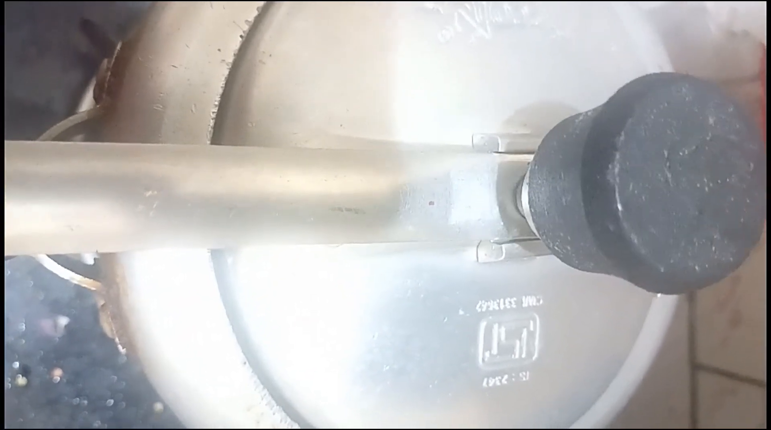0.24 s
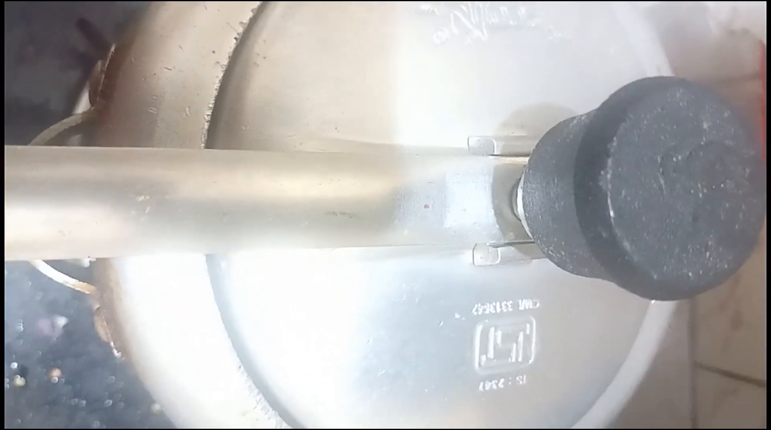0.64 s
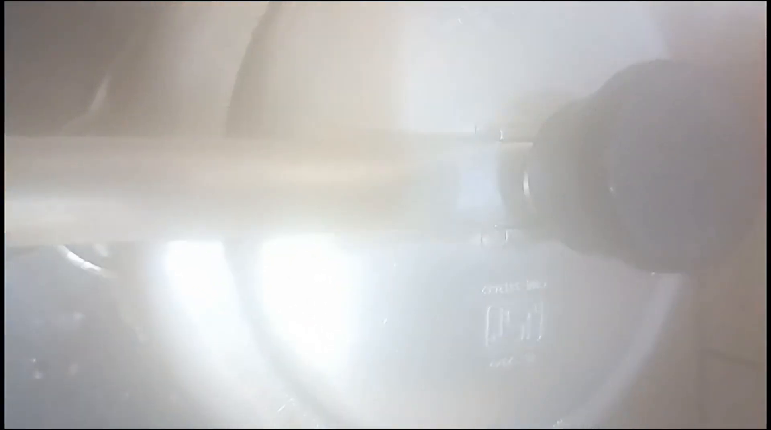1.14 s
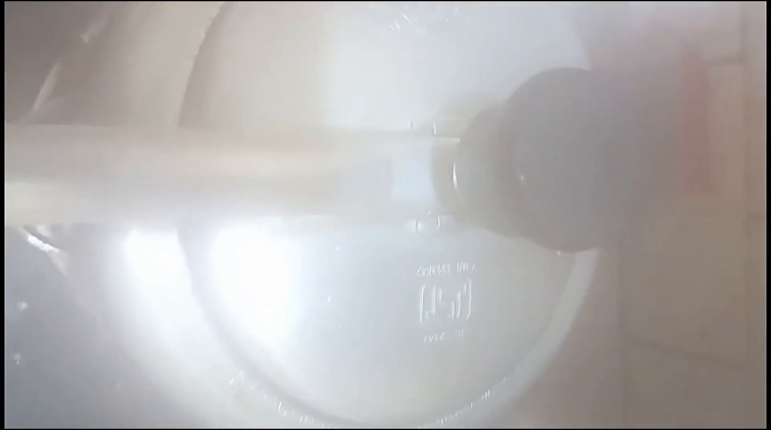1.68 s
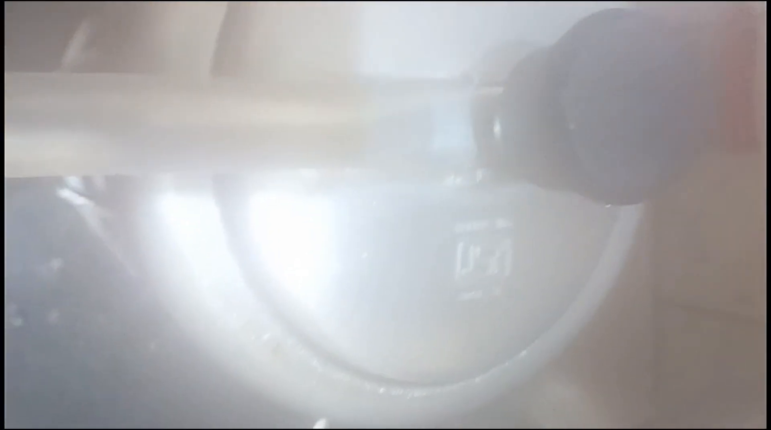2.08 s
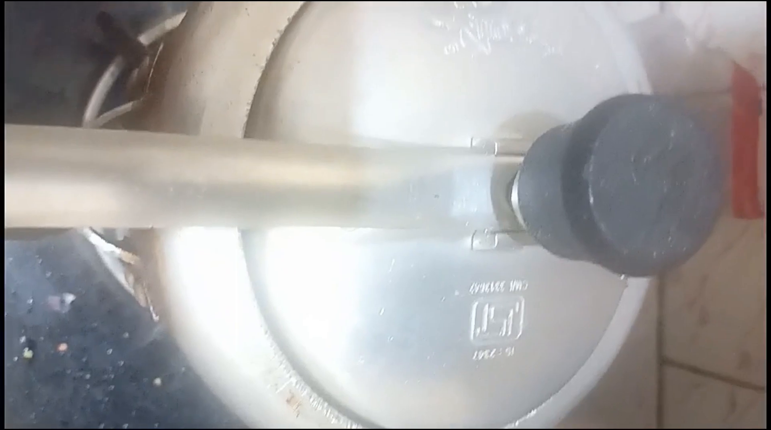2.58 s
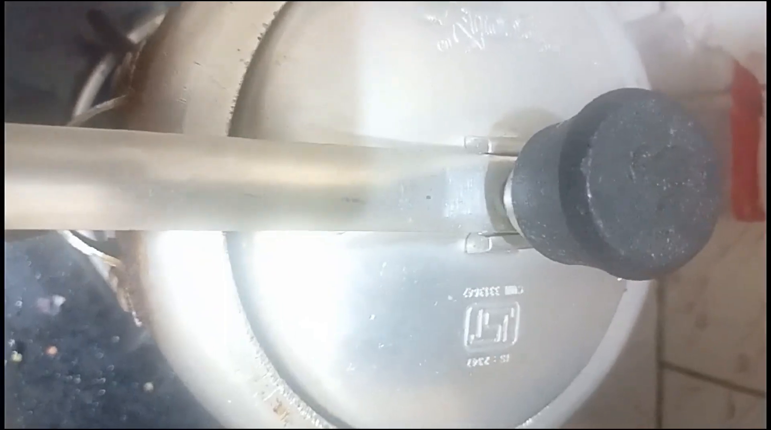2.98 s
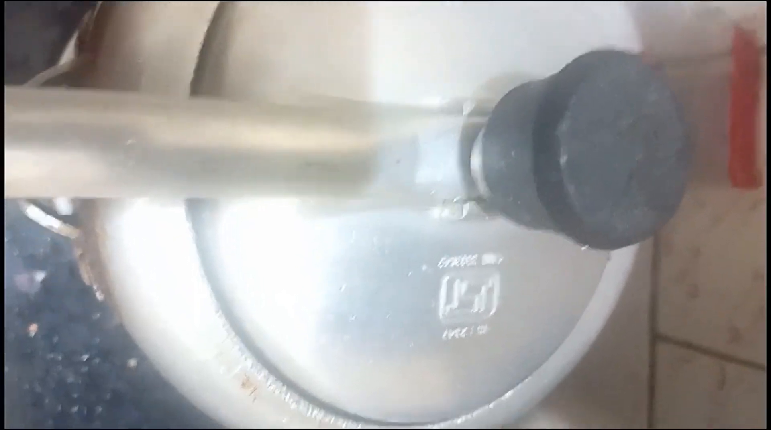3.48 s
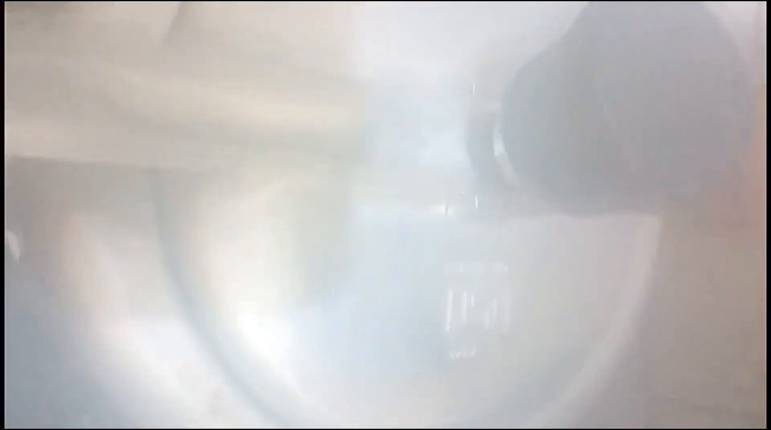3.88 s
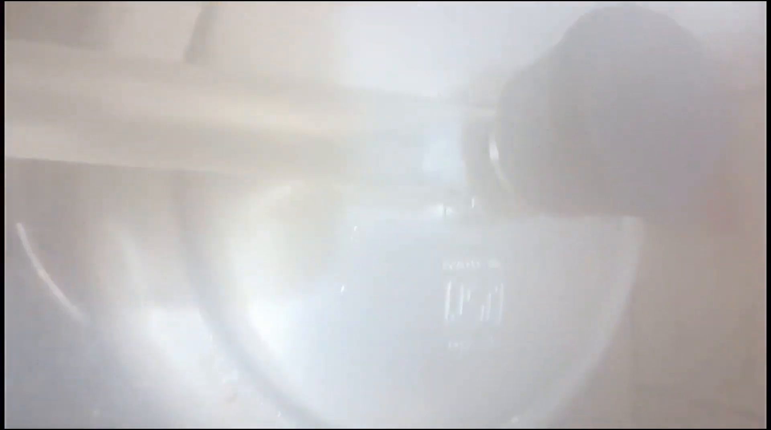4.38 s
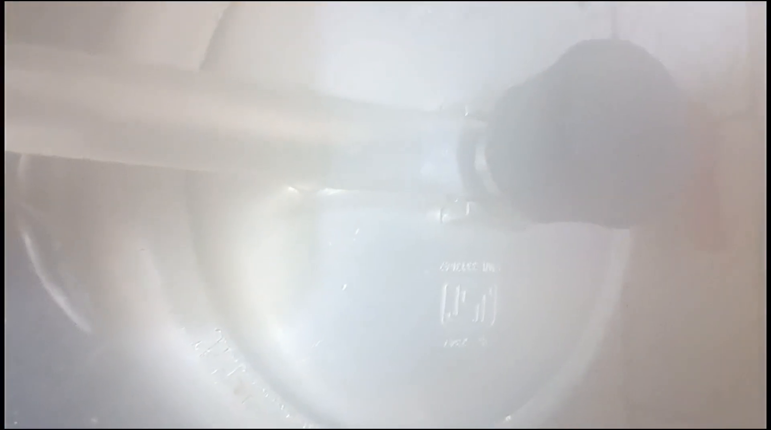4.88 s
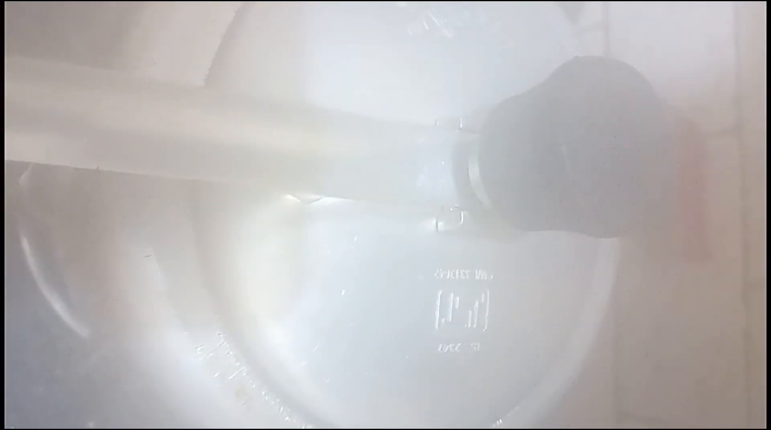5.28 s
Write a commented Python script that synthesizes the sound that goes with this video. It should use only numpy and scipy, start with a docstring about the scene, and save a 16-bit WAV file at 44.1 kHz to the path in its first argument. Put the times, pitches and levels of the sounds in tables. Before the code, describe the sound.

Close, sharp hiss of steam from a pressure cooker stops as its weight settles, then returns in a shorter second burst.

```python
"""A pressure cooker vents steam a hand's width from a phone, in a tiled kitchen with a very faint background.
It leaks and spits, then the weight lifts and the jet hisses through its cavities, ringing off the tiles
and blowing puffs onto the microphone. At 3.3 s the weight knocks back onto its seat and the hiss fades;
then the level drops abruptly. After a brief mute a second burst fades in, ending the same way at 4.9 s.
Last, a faint hum and a far tone come in."""
import sys
import numpy as np
from scipy import signal
from scipy.io import wavfile
from scipy.ndimage import uniform_filter1d

SR = 44100
rng = np.random.default_rng(int(sys.argv[2]) if len(sys.argv) > 2 else 0)


def put_to_file(sound):
    """Save the sound as 16-bit audio at rate SR, in the file named by the first command-line argument."""
    columns = np.atleast_2d(sound).T  # one column per channel
    safe = np.clip(columns, -1, 1)
    whole_steps = np.round(safe * 32767)
    wavfile.write(sys.argv[1], SR, whole_steps.astype(np.int16))


N = 244314
T = np.arange(N) / SR


def undb(db):
    """Gain of a dB value."""
    return 10 ** (np.asarray(db) / 20)


def level(x, db):
    """Set a sound to an rms level."""
    return x * undb(db) / np.sqrt(np.mean(x ** 2))


def ramp(start, length):
    """Rise from 0 to 1; start and length in seconds."""
    return np.clip((T - start) / length, 0, 1)


def colour_db(points, hz):
    """An EQ curve: points joined on a log-frequency axis."""
    f, db = np.transpose(points)
    return np.interp(np.log(hz + 1), np.log(f), db)


def shaped_noise(db_of, size):
    """White noise through a moving EQ, db_of(Hz, seconds)."""
    hz, s, frames = signal.stft(rng.standard_normal(N), SR, nperseg=size)
    return signal.istft(frames * undb(db_of(hz[:, None], s)), SR, nperseg=size)[1][:N]


def patches(shape, bins, steps):
    """Random drift with a spread of 1, smooth over neighbouring bins and time steps."""
    field = uniform_filter1d(uniform_filter1d(rng.standard_normal(shape), bins, axis=0), steps, axis=1)
    return field / field.std()


def clicks(times, sizes):
    """Single-sample impulses."""
    out = np.zeros(N)
    np.add.at(out, (np.asarray(times) * SR).astype(int), sizes)
    return out


# The colour of the room tone. Each row: frequency in Hz, relative level in dB.
ROOM_COLOUR = [(24, -39.5), (45, -15.5), (93, -4.5), (160, -10), (340, -11.5), (520, -16), (1000, -26),
               (2560, -26), (3460, -18.5), (10100, -25.5), (15400, -19)]
def room_tone():
    """A very faint, wavering bed of low-heavy noise."""
    def db_of(hz, at):
        return colour_db(ROOM_COLOUR, hz) + 2.5 * patches((len(hz), len(at)), bins=6, steps=3)
    return level(shaped_noise(db_of, size=2048), db=-81.5)


# The ride of the jet, one list per burst. Each row: time in seconds, hiss level in dB,
# treble lift in dB, relative level of the draught on the microphone in dB.
BURSTS = [
    [(0.0, -37, 4, -49.5), (0.102, -36.5, 1.5, -51), (0.158, -26.5, -1, -49), (0.204, -23.5, 4.5, -56),
     (0.226, -14, -0.5, -51), (0.3, -16.5, 0, -55), (0.41, -19, 0.2, -42), (0.55, -23.5, -1, -56),
     (0.69, -26, -1, -56), (0.88, -27.5, -1.5, -59.5), (1.23, -30, 1, -60.5), (1.94, -33, -1, -62),
     (2.2, -34, 2.2, -57), (2.28, -26.5, 0.7, -57), (2.37, -27.5, 0, -61.5), (3.14, -25.5, 0, -61.5),
     (3.3, -26.5, 3, -64)],
    [(3.65, -30.5, 3, -70), (3.85, -29, 1.2, -63), (3.948, -29.5, 2.5, -56), (4.056, -31, 2, -62),
     (4.246, -31, -0.3, -64), (4.614, -33, 2.5, -64), (4.752, -33.5, 0.4, -63), (4.84, -30.5, 1, -74),
     (4.9, -27.5, 1.5, -55)],
]
# The hiss fades as the weight sinks; then the level drops abruptly. Each row: fade start in seconds,
# time of the level drop in seconds, drop in dB, slope of the fade in dB per second.
ENDINGS = [(3.301, 3.418, -8, -210), (4.899, 4.998, -9, -185)]
REOPEN_S = BURSTS[1][0][0]
def vent(tail_db_per_s=-230, shut_treble_db=-6, shut_roar_db=13, leak_roar_db=5.5, still_air_db=-88):
    """Level, treble, low roar and draught curves in dB: two bursts, each fading as the weight sinks."""
    times, *columns = np.vstack(BURSTS).T
    second = T >= REOPEN_S
    held = np.where(second, T, np.minimum(T, BURSTS[0][-1][0]))
    level_db, treble_db, draught_db = (np.interp(held, times, column) for column in columns)
    start, drop, _, slope = np.transpose(ENDINGS)[:, second.astype(int)]
    fade_db = slope * np.clip(np.minimum(T, drop) - start, 0, None)
    fade_db += tail_db_per_s * np.clip(T - drop, 0, None)
    fade_db += second * 0.78 * 20 * np.log10(ramp(REOPEN_S, 0.31) + 0.017)  # the second burst fades in
    leaking = 1 - ramp(0.14, .04)  # more low roar before the weight lifts
    closing = ramp(start, 0.062)  # the closing gap dulls the hiss
    return (level_db + fade_db,
            treble_db + shut_treble_db * closing,
            leak_roar_db * leaking + shut_roar_db * closing,
            np.maximum(draught_db + fade_db, still_air_db))


# The colour of the hiss: one list for the first blast, then one for each of three places of the phone.
# Each row: frequency in Hz, relative level in dB.
HISS_COLOURS = [
    [(180, -49), (300, -20), (492, -20.5), (1030, -27), (1810, -20), (1960, -22.5), (2470, -16.5),
     (3330, -5), (4400, -3), (5280, -6), (5730, -5.5), (7840, -4.5), (9870, -7.5), (11800, -4.5),
     (15400, -0.5)],
    [(180, -33), (300, -22.5), (1050, -26), (1810, -19), (1960, -22.5), (2470, -17), (3270, -6.5),
     (3860, -5.5), (4400, -4.5), (5360, -5.5), (5730, -4.5), (7710, -3), (9710, -9.5), (13300, -2.5),
     (15400, 0.5)],
    [(180, -30.5), (300, -23), (1200, -26.5), (1810, -18), (2030, -24), (2470, -15), (3330, -2.5),
     (3610, -6), (4470, -3), (5190, -9.5), (7840, -3), (9870, -9.5), (11300, -7.5), (13100, -2), (15400, 1)],
    [(180, -32), (300, -24), (1120, -27), (1640, -22), (1900, -26), (2560, -18.5), (3270, -10),
     (3920, -4.5), (5640, -8), (7970, -6.5), (9710, -14), (11400, -10), (12600, -6.5), (13700, -1.5),
     (15400, -5.5)],
]
COLOUR_SWITCHES_S = (.6, 1.9, 3.62)
# The cavities of vent and weight. Each row: centre in Hz, width in Hz, boost or cut in dB.
CAVITIES = [(1884, 65, 1), (3308, 79, 5.5), (3870, 59, 5.5), (4410, 330, 2.5), (5310, 180, -2),
            (5780, 130, 2.5), (6830, 140, 3.5), (7060, 110, 2.5), (7740, 220, 5), (8270, 87, 2.5),
            (10100, 600, -4), (11730, 200, 4.5), (13100, 200, 1.5), (13800, 410, 2)]
def jet(level_db, treble_db, roar_db):
    """Turbulent hiss: bands swell in slow patches and flicker, small eddies roughen the level."""
    def db_of(hz, at):
        place = np.searchsorted(COLOUR_SWITCHES_S, at)
        db = np.hstack([colour_db(colour, hz) for colour in HISS_COLOURS])[:, place]
        db += sum(lift_db / (1 + (2 * (hz - centre) / width) ** 2) for centre, width, lift_db in CAVITIES)
        db += np.clip((hz - 8500) / 3000, 0, 1) * np.interp(at, T, treble_db)
        db += np.clip((2800 - hz) / 1100, 0, 1) * np.interp(at, T, roar_db)
        db += 0.87 * patches(db.shape, bins=8, steps=30)
        db += .9 * patches(db.shape, bins=24, steps=3)
        body = (hz[:, 0] > 2500) & (hz[:, 0] < 9000)  # level_db sets this band
        return db - 10 * np.log10(np.sum(undb(2 * db[body]), axis=0) / len(hz))
    eddies_db = 0.44 * patches((1, N), 1, 300)[0] + 0.18 * patches((1, N), 1, 2500)[0]
    return shaped_noise(db_of, size=1024) * undb(level_db + eddies_db)


def tiles(x, t60, wet_db):
    """Direct sound plus a dense, decaying scatter of echoes off the tiles."""
    t = T[:SR // 2]
    echoes = rng.standard_normal(len(t)) * np.exp(-np.log(1000) * t / t60) * (t > .002)
    return x + undb(wet_db) * signal.fftconvolve(x, echoes / np.sqrt(np.sum(echoes ** 2)))[:N]


# Drops of water in the vent. Each row: start in seconds, relative level in dB.
SPITS = [(.04, -41), (.121, -23), (.15, -18)]
def spits(attack_s=.0022):
    """Drops spat out as the weight lifts, each a short burst of narrow hiss."""
    starts, db = np.transpose(SPITS)
    age = T[:1024] / attack_s
    envelope = signal.fftconvolve(clicks(starts, undb(db)), age * np.exp(1 - age))[:N]
    band = signal.butter(2, (2700, 4800), "bandpass", fs=SR, output="sos")
    return envelope * level(signal.sosfilt(band, rng.standard_normal(N)), db=-8.0)


# Surges and dips of the jet. Each row: centre in seconds, boost or cut in dB, half-width in seconds.
SURGES = [(0.044, 3.5, 0.0056), (0.163, 4, 0.0037), (0.173, 6.5, 0.0044), (0.195, 3, 0.0036),
          (0.226, 1.5, 0.0058), (3.34, -3, 0.003), (3.355, 6, .004)]
def flutter_db():
    """The weight flutters as it lifts or lands, and the whole jet surges with it."""
    return sum(db * np.exp(-((T - at) / width) ** 2) for at, db, width in SURGES)


def push(swell_ms):
    """Air pushes the diaphragm and leaks away; the phone's bass cut swings it back twice."""
    t = T[:2048]
    pressure = np.exp(-t / 0.0012) * (1 - np.exp(-(t / (swell_ms / 1000)) ** 2))
    thump = signal.sosfilt(signal.butter(3, 78, "highpass", fs=SR, output="sos"), pressure)
    return thump / thump.max()


# The clear puffs. Each row: time in seconds, peak in dB, direction as +1 or -1, swell in milliseconds.
PUFFS = [(0.223, -39, 1, 2), (0.2307, -12, -1, 0.68), (.2627, -34, -1, 1.8), (0.324, -34, 1, 2),
         (0.342, -27.5, -1, 2.2), (0.3515, -32, 1, 1.7), (0.391, -26, 1, 1.3), (0.4031, -30, -1, 1.4),
         (0.4163, -27.5, 1, 1.9), (0.489, -32, 1, .7), (0.5607, -16, 1, 0.46), (.5698, -24.5, -1, .6),
         (0.7071, -26.5, 1, 0.44), (1.053, -36.5, -1, 0.86), (1.899, -38.5, 1, 0.58),
         (2.1829, -19.5, 1, 0.4), (2.2745, -35, 1, 0.49), (2.4773, -45, -1, 0.75), (2.589, -40, 1, 0.59),
         (2.611, -43, -1, 0.73), (3.833, -46, 1, .9), (3.94, -32, -1, 0.44), (4.2122, -46, 1, 0.98),
         (4.6082, -39.5, -1, 0.62)]
def puffs(draught_db, count=2500):
    """The draught hits the microphone: clear puffs over a patter of small ones."""
    when, direction, strength = rng.random((count, 3)).T
    sizes = np.sign(direction - .5) * undb(-3.1 * np.log(strength + 1e-6))
    patter = signal.fftconvolve(clicks(when * (N - 1) / SR, sizes), push(swell_ms=0.74))[:N]
    out = level(patter, db=-2.5) * undb(draught_db)
    for at, db, way, swell_ms in PUFFS:
        i = int((at - swell_ms / 2000) * SR)
        out[i:i + 2048] += np.sign(way) * undb(db) * push(swell_ms)
    return out


# The weight touches its seat. Each row: start in seconds, relative level in dB.
KNOCKS = [(3.328, -40), (3.35, -34), (3.385, -46), (3.405, -49.5), (4.895, -44.5), (4.925, -43),
          (4.939, -44.5), (4.99, -49)]
# The ring of the lid. Each row: pitch in Hz, relative level in dB, seconds to die away by 60 dB.
LID_MODES = [(93, -11, 0.3), (555, -4, .07), (616, 0.5, .06), (696, -1, 0.059), (773, 3, 0.1),
             (803, -2, 0.13), (1130, -16, .07), (1420, -6, .06)]
def knocks(scrape_s=0.011):
    """The weight scrapes as it lands, so a blow and a brief tail of noise ring the lid."""
    t = T[:SR // 2]
    ring = sum(undb(db) * np.exp(-np.log(1000) * t / t60) * np.sin(2 * np.pi * hz * t)
               for hz, db, t60 in LID_MODES)
    starts, db = np.transpose(KNOCKS)
    blows = clicks(starts, undb(db))
    scrape = signal.lfilter([1], [1, -np.exp(-1 / (scrape_s * SR))], blows) * rng.standard_normal(N)
    return signal.fftconvolve(0.8 * blows + 0.057 * scrape, ring / ring.max())[:N]


def level_drops_db(drop_s=0.0086):
    """After each fade the level drops abruptly, cutting off hiss and ring; it is back for burst two."""
    (_, first, first_db, _), (_, second, second_db, _) = ENDINGS
    return first_db * ramp(first, drop_s) * (T < REOPEN_S) + second_db * ramp(second, drop_s)


def sine(hz, db):
    """A sine that follows a pitch curve and an rms level curve."""
    return np.sqrt(2) * undb(db) * np.sin(2 * np.pi * np.cumsum(hz) / SR)


def hum(start_s=5.08, start_hz=405, rest_hz=343, sag_hz_per_s=400):
    """A faint, wavering hum sags to its resting pitch."""
    hz = np.maximum(start_hz - sag_hz_per_s * (T - start_s), rest_hz)
    level_db = -89.5 + 4 * patches((1, N), 1, 900)[0]
    return sine(hz, level_db) * ramp(start_s, .02)


# The partials of the far tone. Each row: multiple of the pitch, time of full level in seconds,
# full level in dB, swell in dB per second.
TONE_PARTIALS = [(1, 5.43, -78.5, 280), (2, 5.51, -90, 260)]
def far_tone(hz=669):
    """A faint, distant tone swells in, its octave just behind."""
    return sum(sine(np.full(N, multiple * hz), db - swell * np.clip(full_s - T, 0, None))
               for multiple, full_s, db, swell in TONE_PARTIALS)


def scene():
    """The cooker echoes off the tiles; puffs and background reach the microphone dry."""
    level_db, treble_db, roar_db, draught_db = vent()
    cooker = jet(level_db, treble_db, roar_db) * undb(flutter_db()) + spits() + knocks()
    echoing = tiles(cooker, t60=0.1, wet_db=-10)
    mono = echoing * undb(level_drops_db()) + puffs(draught_db) + room_tone() + hum() + far_tone()
    return np.array([mono, mono])


MUTE_S, TOP_HZ = (3.602, 3.649), 15480
def record(dry):
    """One microphone on both channels: peaks rounded, a brief mute between the bursts, the top cut off."""
    rounded = np.tanh(1.065 * dry) / 1.113
    gate = (T < MUTE_S[0]) | (T > MUTE_S[1])
    return signal.sosfilt(signal.ellip(14, .3, 100, TOP_HZ, fs=SR, output="sos"), rounded * gate)


dry = scene()
out = record(dry)
put_to_file(out)
```